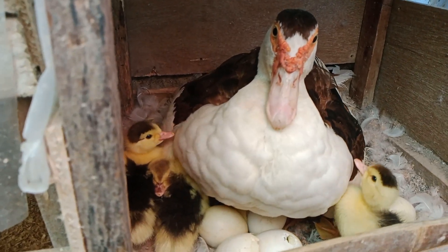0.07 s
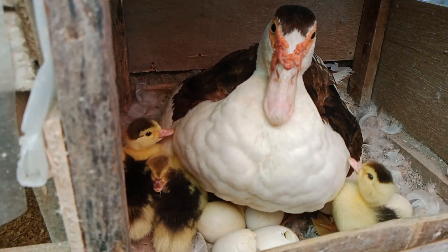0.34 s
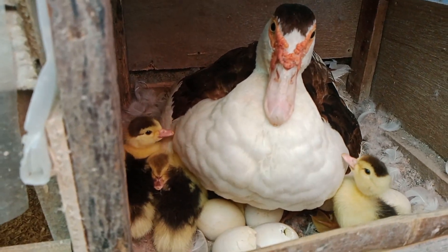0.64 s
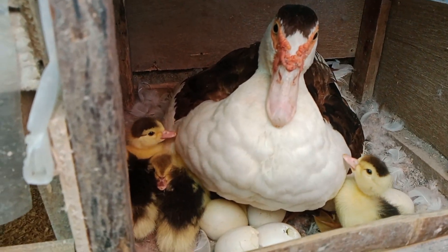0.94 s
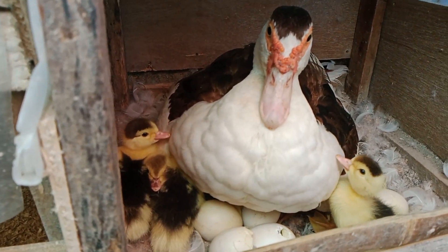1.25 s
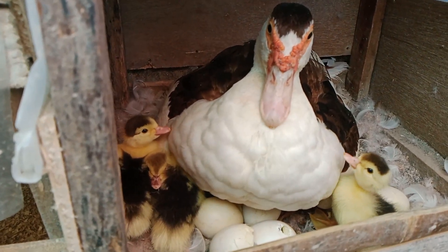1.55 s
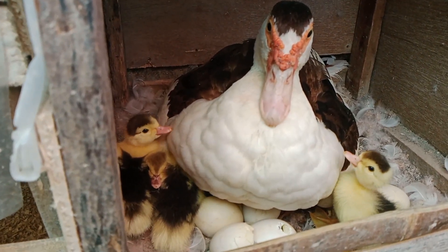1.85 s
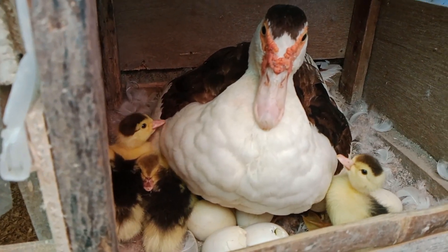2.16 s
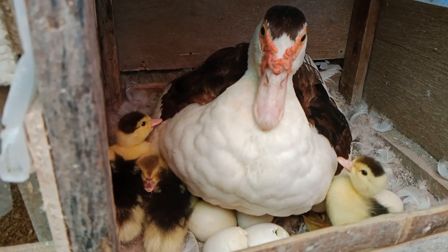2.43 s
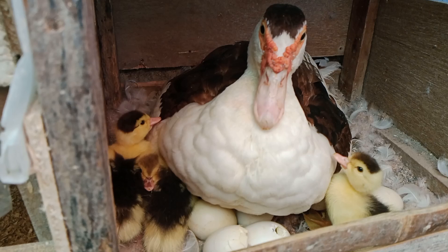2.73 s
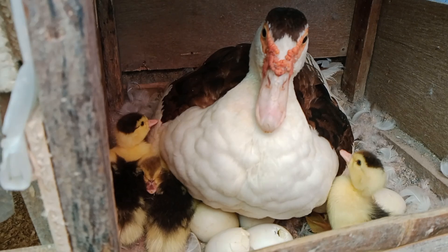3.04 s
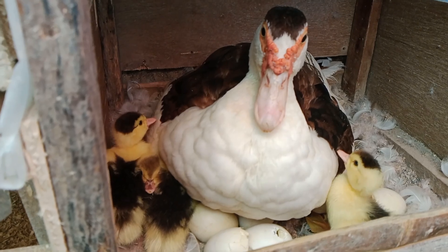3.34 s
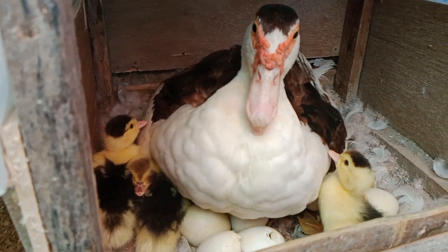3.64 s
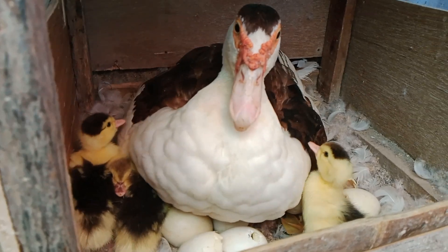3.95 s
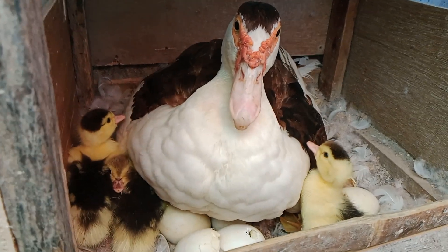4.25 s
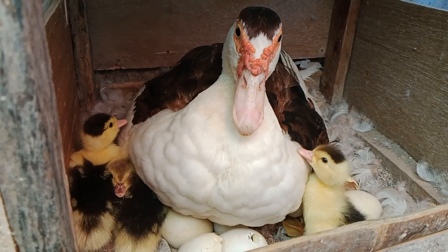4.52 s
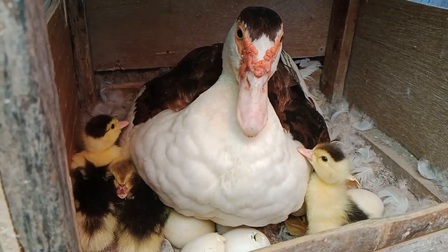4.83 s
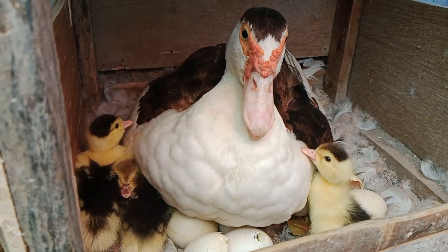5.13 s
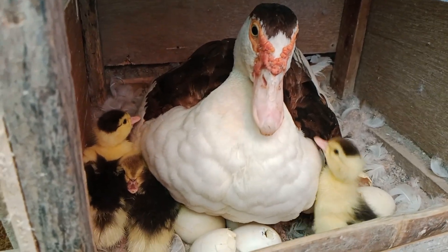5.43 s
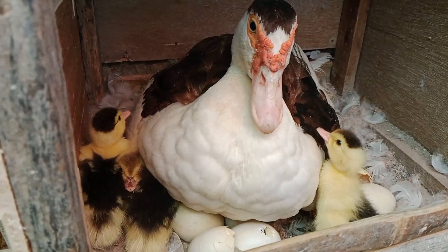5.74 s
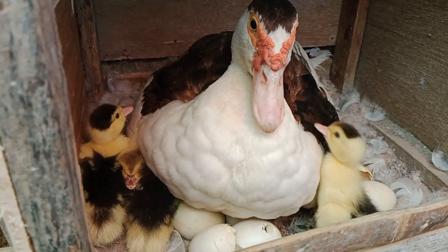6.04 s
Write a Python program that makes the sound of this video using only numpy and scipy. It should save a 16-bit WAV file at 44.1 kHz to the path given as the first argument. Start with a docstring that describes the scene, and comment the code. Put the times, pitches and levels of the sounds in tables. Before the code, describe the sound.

A busy run of short, high, warbling duckling calls comes from a small wooden nest box, heard up close. Straw crackles and boards knock lightly as the birds shift and peck. A single harsh squawk, nearest of all, interrupts; after a pause the trills return, then thin out to soft whistles. Across the yard are faint crowing and a hen's short moan, with slight wind rumble on the microphone.

```python
"""Ducklings peep around their mother in a wooden nest box, close to the microphone. A lower and a higher
voice warble in short trills: clean from one side of the syrinx, raspy when the other side joins in.
Thin whistles glide from the back of the box; one loud squawk breaks out nearest of all.
Feet and bills scratch the straw and bump the boards. Across the yard, other poultry call faintly
over quiet outdoor air and a low, swelling rumble of wind or handling on the microphone."""
import sys
import numpy as np
from scipy import signal
from scipy.fft import rfft, irfft, next_fast_len
from scipy.io import wavfile

SR = 44100
rng = np.random.default_rng(int(sys.argv[2]) if len(sys.argv) > 2 else 0)


def unload_audio(sound):
    """Save the sound as a 16-bit wav file, at the path given as the first command line argument."""
    columns = np.transpose(np.atleast_2d(sound))
    # keep every value between -1 and 1, then stretch to whole-number steps
    steps = np.round(np.clip(columns, -1, 1) * 32767)
    wavfile.write(sys.argv[1], SR, steps.astype(np.int16))


N = 276941
TIME = np.arange(N) / SR
END_HZ = 1357  # every trill drops to this pitch

# spectrum of the rasp in the birds' voices: f/Hz, relative level/dB
RASP_SPECTRUM = [(1470, -32.5), (2500, 9), (2930, 5), (3340, 2), (4330, 6.5), (4780, -6), (5010, -3.5),
                 (5750, -5.5), (6300, -24), (7170, -6), (8100, -15.5), (8880, -15.5), (9510, -34.5),
                 (10300, -22), (15500, -78)]


def undb(db):
    """Decibels to gain."""
    return 10 ** (np.asarray(db) / 20)


def unit(x):
    """Scale to rms 1."""
    return x / np.sqrt(np.mean(x ** 2) + 1e-18)


def noise():
    """White noise."""
    return rng.standard_normal(N)


def cut(x, order, hz, kind="low"):
    """Low-pass or high-pass filter."""
    return signal.sosfilt(signal.butter(order, hz, kind, fs=SR, output="sos"), x)


def colour(x, points):
    """Filter by a spectrum (f/Hz, level/dB) that falls away below its first point; rms 1."""
    hz, db = np.transpose(points)
    size = next_fast_len(N + 4096)
    f = np.maximum(np.fft.rfftfreq(size, 1 / SR), 1)
    gain = undb(np.interp(np.log(f), np.log(hz), db)) * np.minimum(f / hz[0], 1) ** 2
    return unit(irfft(rfft(x, size) * gain, size)[:N])


def resonate(x, hz, width_hz):
    """A resonance with gain 1 at its centre."""
    return signal.lfilter(*signal.iirpeak(hz, hz / width_hz, fs=SR), x)


def steep_band(x, hz, width_hz):
    """Two equal resonances in series."""
    return resonate(resonate(x, hz, width_hz), hz, width_hz)


def flutter(rate_hz):
    """Smooth random motion of spread 1."""
    return unit(cut(noise(), 2, rate_hz))


def curve(rows, column=1):
    """Join the rows of a table by straight lines in time."""
    rows = np.asarray(rows)
    return np.interp(TIME, rows[:, 0], rows[:, column])


def gate(start, end, fade):
    """1 between start and end, with soft edges."""
    return np.clip(np.minimum(TIME - start, end - TIME) / fade, 0, 1)


def phase_of(hz):
    """Running phase of a pitch curve."""
    return 2 * np.pi * np.cumsum(hz) / SR


def partials(phase, rows):
    """A stack of harmonics (multiple, level/dB)."""
    return np.sqrt(2) * sum(undb(db) * np.sin(round(k) * phase) for k, db in rows)


def bursts(rows, attack, tail):
    """Envelope of events (t/s, length/s, level/dB): a rise, a sag while they last, a short tail."""
    out = np.zeros(N)
    for start, length, db in rows:
        on = (TIME > start) & (TIME < start + length + 10 * tail)
        age = TIME[on] - start
        decay = np.exp(-.5 * age / length - np.maximum(age - length, 0) / tail)
        out[on] += undb(db) * np.minimum(age / attack, 1) * decay
    return out


def yard():
    """Quiet outdoor air and a low, swelling rumble of wind or handling on the microphone."""
    # spectrum of the open air: f/Hz, relative level/dB
    air_spectrum = [(15, -51.5), (25, -25.5), (96, 17), (269, 3), (1390, -5), (2810, -7), (3130, -17.5),
                    (4450, -15.5), (4820, -20), (5520, -30), (7630, -3), (9460, -22), (15800, -65)]
    # swells of the rumble: t/s, length/s, level/dB
    swells = [(1.22, 0.24, -59), (2.98, 0.33, -64), (4.76, 0.14, -62.5), (5.07, .52, -61),
              (5.72, 0.92, -67.5)]
    # f/Hz, relative level/dB
    rumble_spectrum = [(25, -25), (50, -11.5), (66, 5.5), (90, -.5), (150, -15), (300, -29), (700, -43)]
    air_db, rumble_rest_db = -79, -83
    air = colour(noise(), air_spectrum) * undb(air_db + flutter(6))
    rumble = cut(colour(noise(), rumble_spectrum), 4, 600)
    return air + rumble * (undb(rumble_rest_db) + bursts(swells, attack=.017, tail=.015))


def poultry():
    """Across the yard: a hen's short moan and the held notes of far crowing."""
    # the hen's moan: t/s, pitch/Hz, relative level/dB
    moan = [(4.95, 390, -51), (5.015, 425.4, -48.5), (5.035, 421, -35.5), (5.055, 448, -29.5),
            (5.10, 426, -31.5), (5.13, 397, -49.5), (5.16, 435.4, -45), (5.20, 418, -69)]
    # her harmonics: multiple, level/dB
    hen_partials = [(1, -11.5), (2, -12.5), (3, -1.5), (4, -21), (5, -26)]
    # crowed notes: start/s, end/s, pitch/Hz, level/dB
    crows = [(-.1, 0.293, 616, -72.5), (2.545, 2.69, 604, -53.5), (2.643, 2.887, 630, -60.5),
             (4.89, 5.009, 598.5, -62.5)]
    # their harmonics: multiple, level/dB
    crow_partials = [(1, -21.5), (2, 0), (3, -11)]
    quaver = 1 + .03 * flutter(180)
    throb = undb(2 * flutter(70))
    hen = throb * partials(phase_of(curve(moan) * quaver), hen_partials)
    out = hen * undb(curve(moan, 2) - 7) * gate(moan[0][0], moan[-1][0], fade=.048)
    waver = 1 + .014 * flutter(56)
    fading = undb(2.5 * flutter(25))
    for start, end, hz, db in crows:
        note = partials(phase_of(hz * waver), crow_partials)
        out += undb(db) * gate(start, end, fade=.047) * fading * note
    return out


def box(x, ring_db, ring_t60):
    """Inside the nest box: close wall echoes make gliding notes throb; a short diffuse ring follows."""
    # echoes off the walls: delay/ms, level/dB
    echoes = [(1.9, -23), (4.6, -25.5), (7.9, -17.5)]
    t = TIME[:SR // 4]
    ring = rng.standard_normal(len(t)) * undb(-60 * t / ring_t60) * (t > .004)
    response = undb(ring_db) * ring / np.linalg.norm(ring)
    response[0] = 1
    for ms, db in echoes:
        response[int(ms * SR / 1000)] += undb(db)
    return signal.fftconvolve(x, response / np.linalg.norm(response))[:N]


def bedding():
    """On the box floor, scratched straw crackles in fine grains; down and straw shuffle softly."""
    # scratches: t/s, level/dB
    strokes = [(1.661, -52), (1.73, -47), (2.344, -51), (2.466, -62.5), (2.526, -55.5), (2.699, -53.5),
               (2.769, -51), (2.889, -33), (2.951, -32.5), (3.017, -39.5), (3.377, -52), (3.416, -48),
               (3.587, -49), (3.681, -41), (3.855, -56.5), (3.914, -57.5), (4.067, -45), (4.237, -60.5),
               (5.497, -42.5)]
    # spectrum of scratched straw: f/Hz, relative level/dB
    straw_spectrum = [(530, -32.5), (900, -32), (1040, 2), (1350, -19.5), (1580, 2.5), (1780, -16),
                      (2010, 0), (2350, -7), (3210, 4), (4760, -5), (5630, -2.5), (8680, -3.5), (9440, -19),
                      (10600, -22), (15800, -37)]
    # loudness of the shuffling: t/s, level/dB
    shuffle_levels = [(0, -81), (.9, -83.5), (1.15, -80), (1.45, -102), (1.8, -80.5), (2.03, -60.5),
                      (2.42, -70.5), (2.6, -62.5), (2.95, -58), (3.33, -68), (3.64, -57), (3.82, -66.5),
                      (4.3, -68.5), (4.75, -83), (5.14, -60), (5.5, -60.5), (5.75, -83.5), (6.28, -77)]
    # spectrum of the shuffling: f/Hz, relative level/dB
    down_spectrum = [(530, -44.5), (900, -12.5), (1080, -11.5), (1540, -39.5), (1760, -6.5), (2190, -20),
                     (2520, -29), (2650, -20), (3170, -1.5), (4490, 2), (4820, -7), (5570, -3.5), (7510, 0),
                     (9550, -11), (15800, -35)]
    scratch_s = .023
    grains = noise() * undb(2.1 * flutter(1100))
    scratching = bursts([(t, scratch_s, db) for t, db in strokes], attack=.0021, tail=.011)
    scratches = colour(grains, straw_spectrum) * scratching
    crackle = noise() * undb(6 * flutter(24) + 3.6 * flutter(400))
    shuffle = colour(crackle, down_spectrum) * undb(curve(shuffle_levels))
    return scratches + shuffle


def boards():
    """Heavier steps set the thin boards ringing."""
    # bumps on the boards: t/s, length/s, level/dB
    bumps = [(.975, 0.024, -65), (1.23, 0.033, -69.5), (2.868, 0.025, -45), (2.93, 0.12, -60.5),
             (3.022, 0.0098, -57), (3.694, 0.0097, -38), (3.907, 0.025, -54.5), (3.96, 0.097, -69),
             (4.07, 0.025, -66.5), (5.877, 0.026, -44.5), (5.905, 0.039, -53), (6.03, 0.037, -65.5)]
    # resonances of the wood: f/Hz, half-width/Hz, relative level/dB
    modes = [(181, 180, -6.5), (362, 190, -4), (475, 110, -5), (731, 43, -22), (1019, 260, -17.5),
             (1850, 57, -14)]
    push = noise()
    wood = sum(undb(db) * steep_band(push, hz, 2 * half_width) for hz, half_width, db in modes)
    wood = unit(cut(wood, 2, 240, "high"))  # thin boards radiate little bass
    return wood * bursts(bumps, attack=.003, tail=.012)


def pecks():
    """A bill strikes: a bright tick and a short hollow knock."""
    # bill strikes: t/s, tick level/dB, knock level/dB
    strikes = [(1.737, -47.5, -57), (1.789, -56, -68), (2.465, -48, -54.5), (4.07, -47.5, -42),
               (4.732, -87, -41), (5.154, -58.5, -42.5), (5.289, -53, -56), (5.355, -46.5, -66),
               (5.524, -44, -47.5)]
    tick_s, knock_s = .0056, .011
    tick = colour(noise(), [(2000, -11.5), (7500, 0), (15000, -16.5)])
    knock = unit(steep_band(noise(), hz=996, width_hz=147))
    ticks = tick * bursts([(t, tick_s, db) for t, db, _ in strikes], attack=.00044, tail=.011)
    knocks = knock * bursts([(t, knock_s, db) for t, _, db in strikes], attack=.014, tail=.0031)
    return ticks + knocks


def whistles():
    """Thin, hoarse glides from the back of the box, each bent through three pitches."""
    # gliding whistles: start/s, end/s, first pitch/Hz, last pitch/Hz, level/dB
    glides = [(0.239, 0.312, 4130, 2290, -56.5), (0.532, 0.594, 2410, 3480, -58.5),
              (1.386, 1.58, 3108, 2270, -54), (2.226, 2.29, 4297, 2242, -53),
              (2.514, 2.561, 4080, 2246, -49.5), (2.716, 2.784, 3997, 2580, -46),
              (3.141, 3.231, 4100, 2440, -47), (3.281, 3.339, 2830, 3353, -59.5),
              (4.458, 4.499, 2260, 3460, -60.5), (4.509, 4.579, 2670, 3403, -61),
              (4.614, 4.676, 2980, 3597, -57), (5.528, 5.613, 2420, 3160, -53),
              (5.633, 5.702, 2313, 3196, -57.5), (6.169, 6.235, 2280, 2820, -65),
              (6.24, 6.32, 2910, 3330, -57.5)]
    midway_hz = 3158
    bright_db = -31.5  # at this level the overtone would be as strong as the whistle
    hz, gain = np.full(N, 3000.), np.zeros(N)
    for start, end, first_hz, last_hz, db in glides:
        on = (TIME > start) & (TIME < end)
        progress = (TIME[on] - start) / (end - start)
        bend = np.polyfit([0, .5, 1], [first_hz, midway_hz, last_hz], 2)
        hz[on] = np.polyval(bend, progress)
        gain[on] = undb(db) * np.sin(np.pi * progress) ** .5
    phase = phase_of(hz * (1 + .036 * flutter(600) + .025 * flutter(70)))
    waver = undb(5 * flutter(120) - 2.5)
    overtone = gain / undb(bright_db) * np.sin(2 * phase)
    thin = gain * waver * np.sqrt(2) * (np.sin(phase) + overtone)
    return box(thin, ring_db=-27, ring_t60=.24)  # farther back, so more of the box's ring


def squawk():
    """Nearest the microphone, a loud, low, rough arch: both sides of the syrinx flap at clashing pitches."""
    # course of the squawk: t/s, pitch/Hz, level/dB
    course = [(3.691, 1175, -29), (3.699, 1360, -21), (3.714, 1604, -21.5), (3.738, 1623, -19),
              (3.767, 1419, -24), (3.783, 1185, -18), (3.792, 1088, -34.5), (3.803, 860, -42.5)]
    hz = curve(course)
    phase = phase_of(hz * (1 + .028 * flutter(450)))
    tone = partials(phase, [(1, -.5), (2, -18), (3, -23), (4, -34)])
    clash_phase = phase_of((hz + 360) * (1 + .06 * flutter(500)))
    clash = partials(clash_phase, [(1, -12), (2, -24)])
    flap = undb(2.3 * flutter(350) - .5)
    breath = undb(-23.5) * colour(noise(), RASP_SPECTRUM)
    envelope = undb(curve(course, 2)) * gate(course[0][0], course[-1][0], fade=.0077)
    call = ((tone + clash) * flap + breath) * envelope
    return cut(call, 8, 900, "high")  # a small throat radiates nothing low


def warble(age, length, crest_hz, dip_hz):
    """One trill swoops up to its first note, repeats it at an even pace and drops after the last."""
    swoop_s, note_s, drop_s = .042, .044, .039
    swoop_depth, edge_db = .33, -25  # share of the crest pitch; level at both ends
    body = length - swoop_s - drop_s
    notes = max(round(body / note_s), 1)
    dip = np.sin(np.pi * notes * np.clip((age - swoop_s) / body, 0, 1)) ** 2
    rise = np.clip(1 - age / swoop_s, 0, 1) ** 2
    fall = np.clip(1 - (length - age) / drop_s, 0, 1) ** 2
    hz = crest_hz * (1 - swoop_depth * rise) - dip_hz * dip + fall * (END_HZ - crest_hz)
    arch = 1 - dip - rise - fall  # 1 on each crest
    fade = np.minimum(np.minimum(age, length - age) / .002, 1)
    ends = undb(edge_db * (rise ** 2 + fall ** 2)) * fade
    return hz, dip, arch, ends


def hump(late, swell_db_per_s, sag_db_per_s):
    """Level in dB that climbs to 0 at the climax and sags after it."""
    return np.minimum(swell_db_per_s * late, -sag_db_per_s * late)


def phrase(trills):
    """Pitch, arch and the gains of tone, rasp and undertone: each trill swells to its climax, then sags."""
    tone_dip_db, rasp_dip_db = 2, -5  # level change between notes
    rasp_lead_s, undertone_s = .0086, .091
    hz = np.full(N, float(END_HZ))
    arch, tone, rasp, under = np.zeros((4, N))
    for start, end, crest_hz, dip_hz, climax, swell, tone_db, rasp_db, under_db in trills:
        on = (TIME > start) & (TIME < end)
        age, length = TIME[on] - start, end - start
        hz[on], dip, arch[on], ends = warble(age, length, crest_hz, dip_hz)
        late = age - climax * length
        tone_hump = hump(late, swell, sag_db_per_s=6)
        rasp_hump = hump(late + rasp_lead_s, 2.15 * swell, sag_db_per_s=71.5)  # earlier and steeper
        tone[on] = ends * undb(tone_db + tone_hump + tone_dip_db * dip)
        rasp[on] = ends * undb(rasp_db + rasp_hump + rasp_dip_db * dip)
        under += undb(under_db) * gate(end - undertone_s, end, fade=.035)  # the voice breaks at the end
    return hz, arch, tone, rasp, under


def duckling(trills):
    """One side of the syrinx whistles reedily; pushed harder, the other joins in wider, ragged arches."""
    # how throat and box carry the tone as it glides: f/Hz, gain/dB
    carry = [(1400, -4), (1600, 6.5), (1800, -2), (1900, 3.5), (2000, -3), (2100, 4), (2230, -1),
             (2360, -5.5), (2650, -13)]
    # overtones of the reedy side: multiple, relative level/dB
    reed_partials = [(2, 13.5), (3, -14), (4, -15.5), (5, 0.5)]
    # harmonics of the ragged side: multiple, relative level/dB
    ragged_partials = [(1, -4), (2, 2), (3, 1.5), (4, 0)]
    wander, overtone_db, bill_db = .015, -19.5, 5
    hz, arch, tone, rasp, under = phrase(trills)
    hz = hz * (1 + wander * flutter(30))
    hoarse = rasp / (rasp + tone + 1e-9)
    phase = phase_of(hz * (1 + (.004 + .075 * hoarse ** 2) * flutter(500)))
    shimmer = undb((2.4 + 4.5 * hoarse) * flutter(80))
    whistle = np.sqrt(2) * np.sin(phase) * undb(np.interp(hz, *np.transpose(carry))) * shimmer

    sputter = undb(4 * flutter(90) - 1.8)
    scrape = (.06 + .26 * hoarse) * flutter(900)
    overtones = sputter * colour(partials(phase + scrape, reed_partials), RASP_SPECTRUM)
    reed = (undb(overtone_db) * tone + .42 * rasp) * overtones

    ragged_hz = 1.05 * hz + arch * (600 + 170 * flutter(25))
    ragged_phase = phase_of(ragged_hz * (1 + .021 * flutter(600)))
    screech = colour(partials(ragged_phase, ragged_partials), RASP_SPECTRUM)
    hiss = colour(noise() * (1 + np.sin(phase)), RASP_SPECTRUM)
    grit = (.95 * screech + (.25 + .65 * hoarse) * hiss) * undb(3.5 * flutter(120))

    bill = undb(bill_db * (arch - .7))  # the bill opens on each crest and lets the treble out
    undertone = unit(steep_band(noise(), hz=1121, width_hz=210))
    return tone * whistle + bill * (reed + rasp * grit) + under * undertone


def scene():
    """Two voices overlap in the nest box, the squawk is nearest and driest, and the yard lies behind."""
    # the ducklings' trills: start/s, end/s, crest pitch/Hz, dip between notes/Hz,
    # climax/share of length, swell/(dB/s), tone level/dB, rasp level/dB, undertone level/dB
    trills = [(-.015, 0.102, 2294, 240, 0.76, 105, -55.5, -60, -85),
              (0.103, 0.237, 2238, 336.2, 0.39, 312.5, -42.5, -48.5, -89),
              (0.325, 0.487, 2370, 326.8, 0.54, 66, -49, -52, -101),
              (0.564, 0.773, 2250, 183, 0.55, 230, -35.5, -38, -54.5),
              (0.883, 1.303, 1910, 152.7, 0.32, 161, -39, -43, -97),
              (0.971, 1.164, 2808, 694.2, 0.48, 158, -38, -31, -91),
              (1.246, 1.411, 2252, 264.6, 0.44, 189.5, -34, -46, -53),
              (1.551, 1.825, 2306, 359.1, 0.57, 87.5, -41.5, -39.5, -68.5),
              (1.95, 2.152, 1895, 198, 0.64, 103, -38.5, -55.5, -89),
              (2.231, 2.38, 2302, 208.5, 0.56, 158, -40.5, -47.5, -66),
              (2.502, 2.659, 1982, 123.4, 0.9, 120, -30.5, -44.5, -80),
              (2.824, 2.972, 2230, 144.4, 0.58, 195, -32.5, -34.5, -44.5),
              (2.959, 3.132, 2351, 305.8, .5, 42, -45, -43, -51),
              (3.371, 3.61, 2675, 644, 0.47, 53.5, -45, -45.5, -64.5),
              (4.721, 4.871, 1940, 147.5, 0.64, 159, -32.5, -41.5, -69),
              (5.072, 5.212, 2248, 319.4, 0.34, 452, -34, -69, -45),
              (5.246, 5.467, 1939, 229.7, 0.46, 132, -32.5, -36, -60)]
    split_hz = 2080  # one duckling's crests lie below this pitch, the other's above
    low = duckling([row for row in trills if row[2] < split_hz])
    high = duckling([row for row in trills if row[2] >= split_hz])
    nest = low + high + whistles() + pecks() + bedding() + boards()
    inside = box(nest, ring_db=-5.5, ring_t60=.067)
    near = box(squawk(), ring_db=-13, ring_t60=.043)
    return (inside + near + poultry() + yard())[None]


def record(dry):
    """One microphone, hollow from close reflections; the recorder cuts the top."""
    # bands that the reflections cancel at the microphone: f/Hz, width/Hz, gain/dB
    hollows = [(1273, 22, -1.5), (2712, 350, -6), (4080, 520, -8), (4774, 500, -15), (6397, 700, -9.5),
               (8190, 370, -22), (9100, 130, -5), (9820, 450, -11)]
    top_hz = 15800
    out = dry
    for hz, width_hz, db in hollows:
        out = out - (1 - undb(db)) * resonate(out, hz, width_hz)
    return signal.sosfilt(signal.ellip(10, .2, 70, top_hz, fs=SR, output="sos"), out)


dry = scene()
out = record(dry)
unload_audio(out)
```